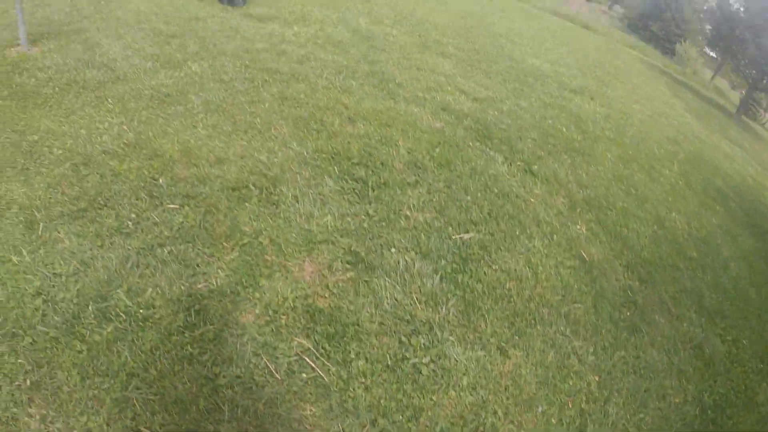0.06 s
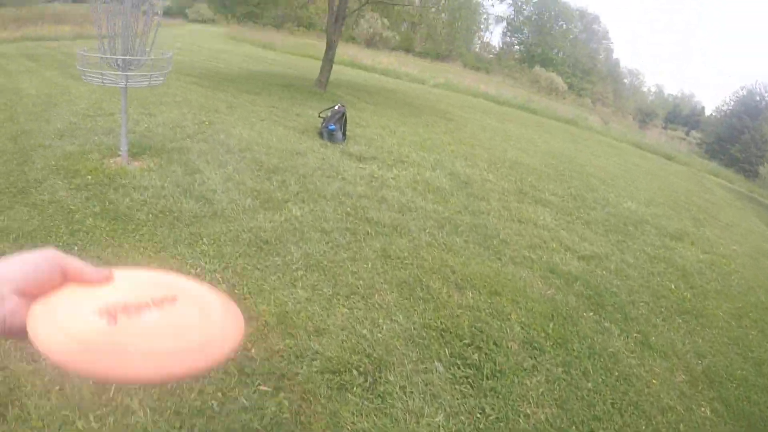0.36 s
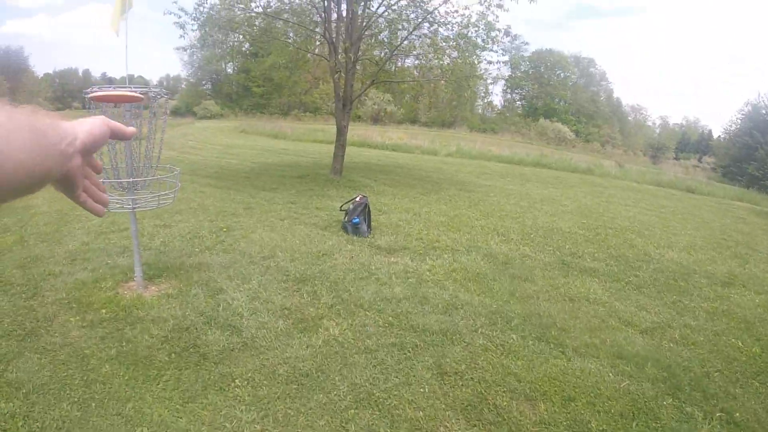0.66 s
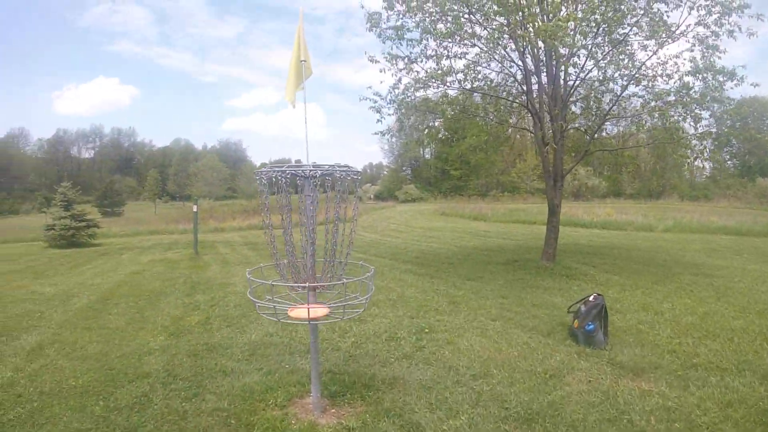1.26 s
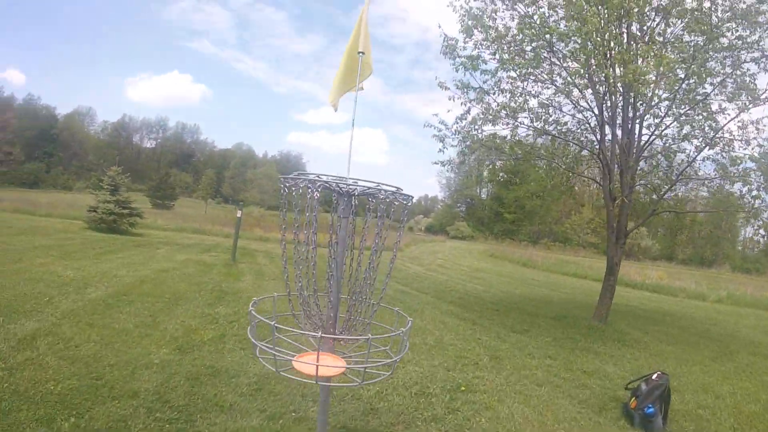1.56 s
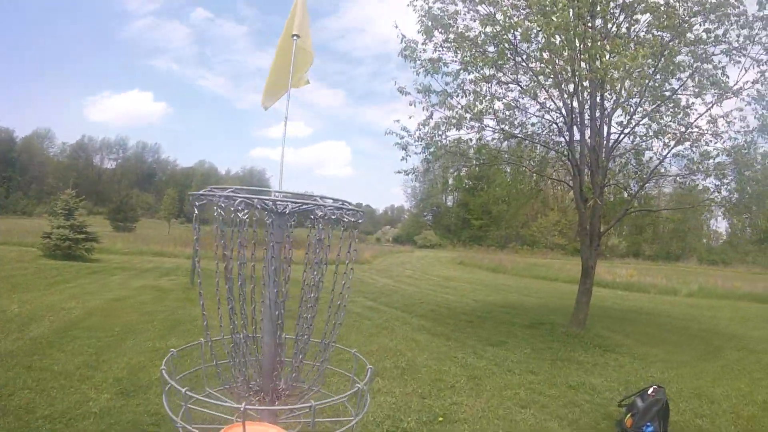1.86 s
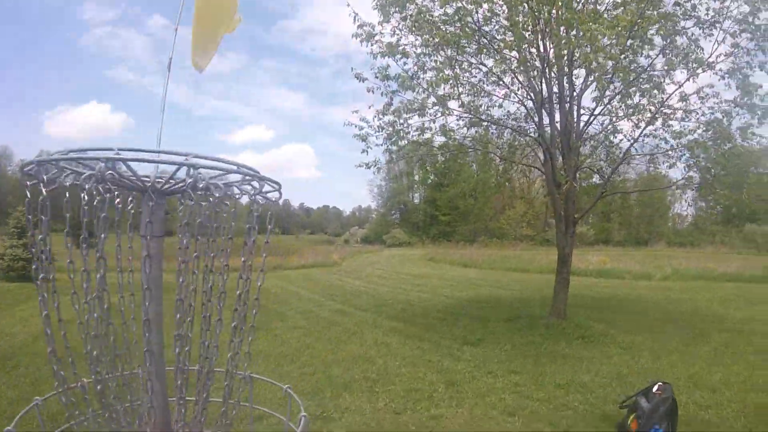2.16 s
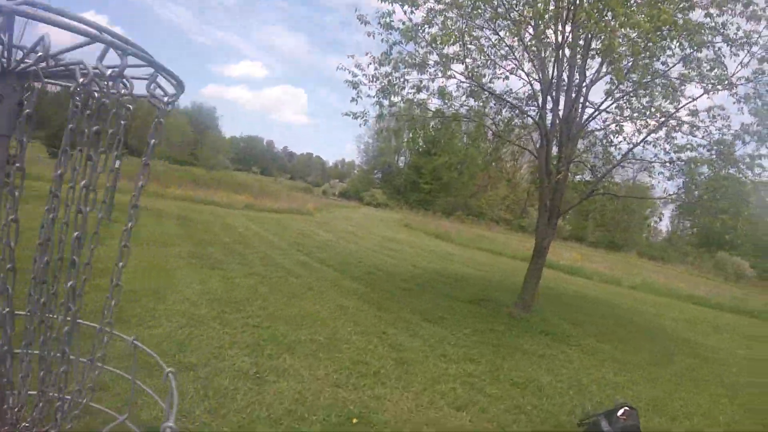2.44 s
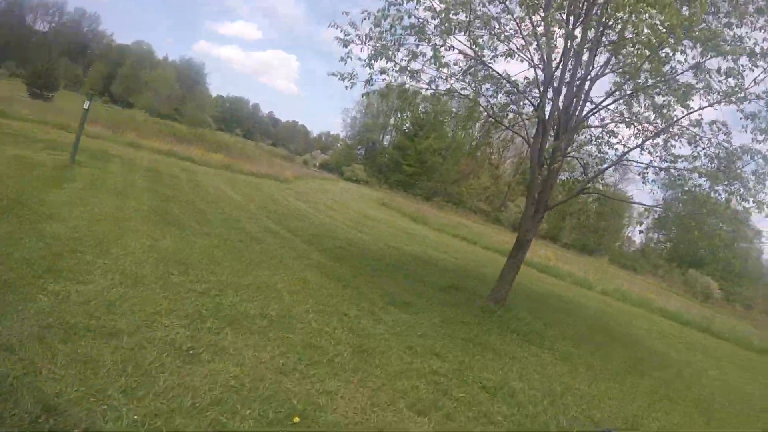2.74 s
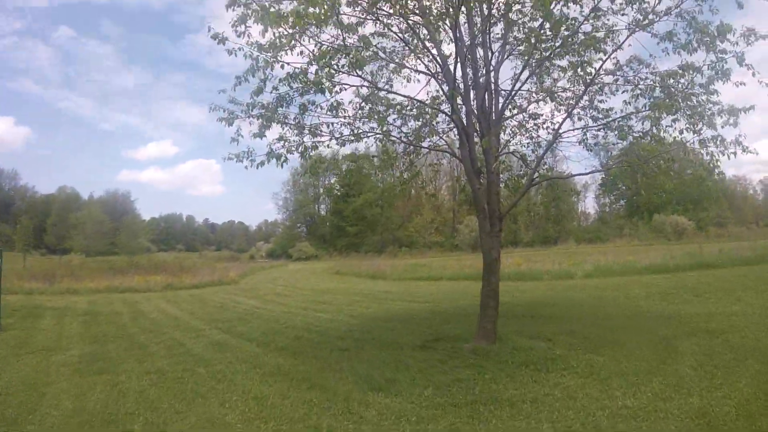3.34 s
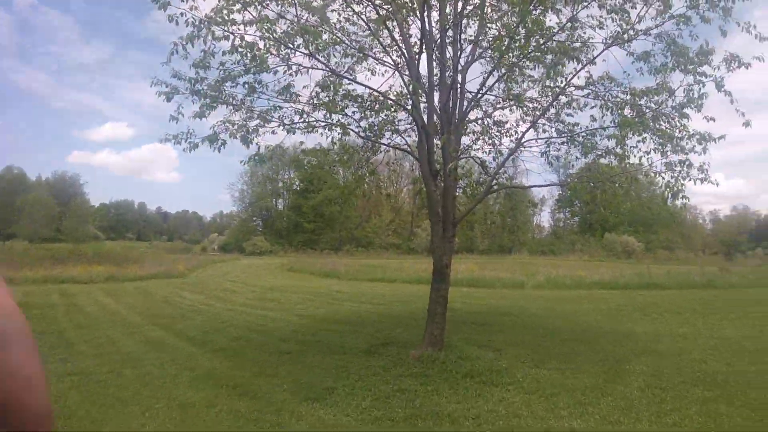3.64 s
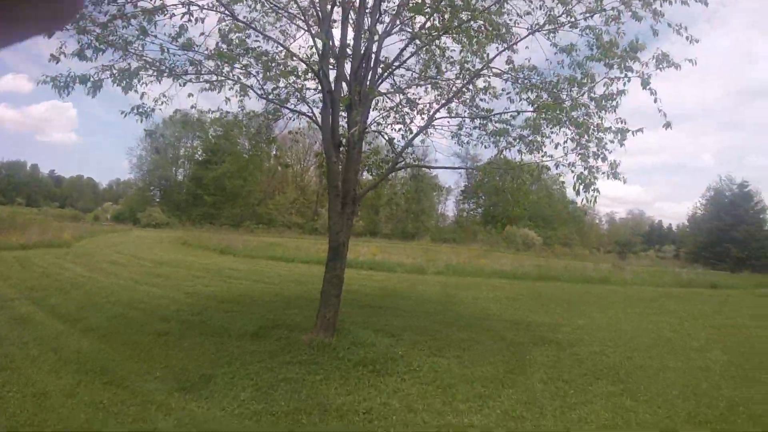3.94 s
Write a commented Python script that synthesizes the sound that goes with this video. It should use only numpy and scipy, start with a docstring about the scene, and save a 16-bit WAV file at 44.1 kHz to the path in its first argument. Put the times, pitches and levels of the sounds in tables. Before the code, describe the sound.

A thrown disc strikes the chains of a metal basket at about 0.9 seconds; the links jingle and settle, and the disc clacks lightly into the wire tray around 1.3 and 1.5 seconds. Clothes and air rustle over a body-worn microphone, with dull walking bumps above a faint steady hiss. From about 3.4 seconds a hand ticks, knocks loudly and scrapes on the microphone's housing, with low rumbles.

```python
"""A putted disc drops into the chains of a steel basket: links clash, ring, clatter and settle,
and the disc clacks into the wire tray. The thrower walks over a breezy lawn with a body-worn
microphone: its mount bumps, clothes and air rustle over it in swells, above a steady hiss.
At the end a hand knocks on its plastic housing, scrapes across it and pushes air at the port."""
import sys
import numpy as np
from scipy import signal
from scipy.fft import rfft, irfft
from scipy.io import wavfile

SR = 44100
rng = np.random.default_rng(int(sys.argv[2]) if len(sys.argv) > 2 else 0)


def transcribe(u):
    """Save the signal u as a 16-bit wav file named by the first command-line argument.

    u: samples, shape (n,) or (channels, n), limited to [-1, 1]; the rate is SR.
    q: integer samples, one column per channel.
    """
    v = np.clip(np.atleast_2d(u).T, -1, 1)
    q = np.round(v * 32767).astype(np.int16)
    wavfile.write(sys.argv[1], SR, q)


N = 176400
TIME_S = np.arange(N) / SR

# disc and chains clash: (time [s], ring [dB], clatter [dB], length [s], link pitch [Hz])
CLASHES = [(0.844, -47, -35.5, 0.036, 4620), (0.908, -37, -42, .008, 4514), (0.923, -48, -48, .03, 4500),
           (0.963, -32, -39, .012, 4500), (0.978, -31.5, -33.5, .015, 4470),
           (0.998, -29.5, -37, .008, 4490), (1.026, -35, -38.5, .03, 4450), (1.100, -49.5, -53, .02, 4500),
           (1.135, -44, -63, .02, 4730), (1.162, -47, -54, .008, 4730), (1.204, -43.5, -47, .005, 4410),
           (1.33, -36.5, -41, 0.0059, 4580), (1.365, -43.5, -50, .015, 4470), (1.703, -72, -55, .01, 4500),
           (1.825, -64, -54, .005, 4500), (3.314, -53, -62, .005, 4500)]
# steel links: (frequency [Hz], level [dB], t60 [s])
LINK_MODES = [(3550, -20, .5), (4530, -32, 0.19), (4473, -4.5, .58), (4540, -7.5, 0.32), (4640, -14, 0.32),
              (5170, -14, 0.2), (5260, -27, 0.11)]
# dense link overtones: (frequency [Hz], density [dB])
CLATTER_SPECTRUM = [(1200, -15), (2200, -18), (2750, 11.5), (3400, 1), (4000, -1), (4700, 9.5), (5400, -4),
                    (6400, -5.5), (7200, -18), (11000, -19), (15000, -28)]
# blurred top overtones: (frequency [Hz], density [dB])
SHIMMER_SPECTRUM = [(7000, -30), (11900, -24), (12450, -3), (12850, 5), (13400, -15), (13980, -1),
                    (14450, -17), (15200, -5)]
# disc lands and shifts: (time [s], level [dB])
TRAY_HITS = [(1.274, -41.5), (1.294, -39.5), (1.545, -48), (1.565, -49)]
# tray wires: (frequency [Hz], density [dB])
TRAY_SPECTRUM = [(400, -14), (850, 8), (1500, 6), (2200, -11), (2800, 17), (3600, 8), (4800, -2),
                 (6500, -14), (9000, -39)]

# finger ticks: (time [s], level [dB], focus [Hz])
TICKS = [(2.501, -35, 6300), (3.425, -28, 5500), (3.454, -16, 930), (3.456, -30, 2650), (3.540, -20, 3100),
         (3.5414, -16, 3150), (3.547, -19, 990), (3.713, 1.5, 2130), (3.72, -1.5, 2407),
         (3.7194, 14.5, 650), (3.864, -3, 1490), (3.898, -14.5, 1900), (3.911, -5.5, 1860),
         (3.924, -11.5, 2500), (3.967, -18, 3540), (3.980, -2.5, 3830), (3.984, -4.5, 1360),
         (3.9905, 1.5, 3860)]
# plastic housing: (frequency [Hz], level [dB], t60 [s])
HOUSING_MODES = [(348, -6.5, 0.053), (417, -6.5, 0.039), (713, -7.5, 0.017), (984, -13.5, 0.023),
                 (1410, -4, 0.015), (1860, -4.5, 0.023), (2140, -10, 0.021), (2491, -4, 0.022),
                 (3190, -13, .012), (3434, -13.5, 0.027), (4050, -12.5, 0.0064), (6260, -14, 0.013),
                 (8000, -32, .006)]
# dry snap of a tick: (frequency [Hz], density [dB])
SNAP_SPECTRUM = [(200, 0), (720, 10), (1100, 9), (2300, -1), (4200, 9), (6500, -25), (9000, -37),
                 (15000, -44)]
# low thumps of housing knocks: (peak time [s], level [dB], frequency [Hz], pre-ring [s], decay [s])
THUMPS = [(3.7207, 4.5, 154, 0.008, 0.0072), (3.724, -8.5, 344, 0.0016, 0.0065),
          (3.864, -11.5, 167.8, 0.0088, 0.0065)]
# hand drag: (time [s], level [dB])
SCRAPE_LEVEL = [(3.50, -112), (3.70, -51), (3.80, -60), (3.842, -56), (3.857, -36.5), (3.866, -33.5),
                (3.880, -54.5), (3.893, -41), (3.908, -26.5), (3.926, -25), (3.948, -34), (3.985, -22),
                (4.0, -27.5)]
# friction hiss: (frequency [Hz], density [dB])
FRICTION_SPECTRUM = [(200, 12), (600, 2.5), (900, -7), (1400, -32), (1900, 6), (2600, 10.5), (3100, 7),
                     (3800, 12), (4400, 3), (5000, -4), (5600, -1), (6400, -9.5), (7300, -19), (12000, -24),
                     (15000, -47)]
# air pushed at the port: (time [s], level [dB])
RUMBLE_LEVEL = [(3.60, -80), (3.68, -57), (3.715, -17), (3.76, -46), (3.81, -36), (3.84, -28),
                (3.88, -28.5), (3.912, -9.5), (3.945, -39), (3.97, -25), (4.0, -5)]
# pushed air: (frequency [Hz], density [dB])
RUMBLE_SPECTRUM = [(15, 1.5), (30, 7.5), (50, 5.5), (80, -7), (150, -6), (220, -6), (350, -23), (700, -63)]

# stride bumps: (time [s], level [dB])
BUMPS = [(0.886, -23), (0.924, -30), (1.474, -27), (2.091, -26.5), (2.735, -29.5), (2.937, -35),
         (3.340, -23.5)]
# microphone mount: (frequency [Hz], level [dB], t60 [s])
MOUNT_MODES = [(166, 2.5, 0.025), (315, -0.5, 0.012), (704, -4.5, 0.0066), (1340, -4, 0.0038),
               (1980, -21, 0.0092)]
# clothes and air on the microphone: (time [s], level [dB])
RUSTLE_LEVEL = [(0.0, -64), (0.15, -62.5), (0.24, -49.5), (0.31, -61), (0.37, -53), (0.46, -55),
                (0.48, -47.5), (0.54, -59.5), (0.66, -60.5), (0.72, -51), (0.84, -59.5), (0.85, -49),
                (0.87, -59), (0.88, -55.5), (0.92, -38.5), (0.98, -55.5), (1.07, -56), (1.11, -42.5),
                (1.16, -46.5), (1.23, -60), (1.31, -51), (1.35, -57.5), (1.46, -62), (1.47, -57),
                (1.58, -52.5), (1.6, -61), (1.71, -55.5), (1.78, -66.5), (1.92, -48.5), (2.02, -62.5),
                (2.1, -41.5), (2.15, -48.5), (2.17, -55.5), (2.24, -61), (2.36, -58.5), (2.38, -65),
                (2.52, -60), (2.53, -67), (2.64, -62), (2.72, -45), (2.77, -56.5), (2.9, -51.5),
                (2.92, -56), (3.27, -59.5), (3.33, -52.5), (3.41, -51), (3.46, -46.5), (3.47, -52),
                (3.48, -62), (3.52, -57)]
# hollow body of the rustle: (frequency [Hz], density [dB])
BODY_SPECTRUM = [(30, -19), (100, -41), (122, -15), (150, 3), (200, 1), (265, -7), (350, -2.5), (450, -9),
                 (650, -16.5), (900, -21.5), (1500, -51)]
# rasp of the rustle: (frequency [Hz], density [dB])
RASP_SPECTRUM = [(450, -40.5), (760, -7.5), (900, -9), (1280, 6), (1560, -7.5), (2120, 2.5), (2280, -6.5),
                 (2500, 1), (2850, -3.5), (3300, -5), (4400, -17), (5500, -27), (12000, -44.5)]
# crisp fabric brushing by: (time [s], level [dB])
FABRIC_LEVEL = [(0, -88), (2.05, -78), (2.12, -56), (2.28, -66.5), (2.36, -83), (2.5, -58.5), (2.58, -73),
                (2.75, -61), (2.9, -58.5), (3.15, -68.5), (3.43, -53.5), (3.5, -60.5), (3.76, -63),
                (4.0, -46)]
# fabric crackle: (frequency [Hz], density [dB])
FABRIC_SPECTRUM = [(1500, -12), (3000, 4.5), (4400, 8.5), (5300, -6.5), (6400, -3.5), (8000, -20),
                   (14000, -34)]
# open air and microphone hiss: (frequency [Hz], density [dB])
HISS_SPECTRUM = [(100, 0), (400, 17.5), (1200, 8.5), (3000, 4), (4600, -12), (5700, -4.5), (6600, 4.5),
                 (9000, 2.5), (11500, -4), (15000, -7)]


def from_db(db):
    """Decibels to gain."""
    return 10 ** (np.asarray(db) / 20)


def unit_rms(x):
    """Scale to rms 1."""
    return x / np.sqrt(np.mean(x ** 2) + 1e-20)


def curve(rows):
    """Breakpoints to one value per sample."""
    return np.interp(TIME_S, *np.transpose(rows))


def drift(rate_hz):
    """Slow random wander; rms 1."""
    pole = np.exp(-2 * np.pi * rate_hz / SR)
    return unit_rms(signal.lfilter([1], [1, -2 * pole, pole * pole], rng.standard_normal(N + SR))[SR:])


def coloured(x, spectrum):
    """Filter by a smooth spectrum; rms 1."""
    hz, db = np.transpose(spectrum)
    bins_hz = np.maximum(np.fft.rfftfreq(N, 1 / SR), 1)
    gain = from_db(np.interp(np.log(bins_hz), np.log(hz), db))
    return unit_rms(irfft(rfft(x) * gain, N))


def noise(spectrum):
    """Coloured noise; rms 1."""
    return coloured(rng.standard_normal(N), spectrum)


def grains(per_s, spread_db):
    """Tiny random slips of uneven size; rms 1."""
    sizes = from_db(spread_db * np.minimum(rng.exponential(1, N), 4))
    return unit_rms((rng.random(N) < per_s / SR) * sizes * rng.choice([-1, 1], N))


def clicks(times_s, heights):
    """One impulse at each time."""
    return np.bincount((np.asarray(times_s) * SR).astype(int), heights, N)[:N]


def ring(x, hz, t60_s):
    """One mode: a unit click starts a decaying unit sine."""
    r, w = from_db(-60 / (t60_s * SR)), 2 * np.pi * hz / SR
    return signal.lfilter([0, np.sin(w)], [1, -2 * r * np.cos(w), r * r], x + 1e-18)


def strike(times_s, heights, modes, spread_db, emphasis=1):
    """Each blow excites each mode with a random strength."""
    weights = emphasis * from_db(spread_db * rng.standard_normal((len(times_s), len(modes))))
    return sum((-1) ** k * from_db(db) * ring(clicks(times_s, heights * weights[:, k]), hz, t60_s)
               for k, (hz, db, t60_s) in enumerate(modes))


def wash(times_s, heights, spectrum, t60_s):
    """Each blow adds decaying noise: overtones too dense to resolve."""
    decay = from_db(-120 / (t60_s * SR))
    energy = signal.lfilter([1], [1, -decay], clicks(times_s, heights ** 2) + 1e-18)
    return np.sqrt(energy) * noise(spectrum)


def chains(contacts_per_s=400, contact_spread_db=2.0, link_gain_db=1.5, detune_hz=53):
    """Contacts share a clash's energy; each rings one link. The chain rings on, clatters, shimmers."""
    contacts, struck_links = [], 0
    for start_s, ring_db, clatter_db, length_s, hz in CLASHES:
        jitter = rng.random(64)
        size, detune = rng.standard_normal((2, 64))
        k = np.arange(int(np.clip(length_s * contacts_per_s, 1, len(jitter))))
        times_s = start_s + length_s * (k + jitter[k] * (k > 0)) / len(k)
        share = from_db(contact_spread_db * size[k])
        share /= np.linalg.norm(share)
        for i in k:
            blow = clicks([times_s[i]], [share[i] * from_db(ring_db + link_gain_db)])
            struck_links += ring(blow, hz + detune_hz * detune[i], t60_s=0.11)
        shimmer_db = -44.5 + 0.5 * clatter_db
        contacts.append([times_s, share * from_db(clatter_db), share * from_db(shimmer_db)])
    times_s, clatter_heights, shimmer_heights = np.hstack(contacts)
    starts_s, ring_db = np.transpose(CLASHES)[:2]
    ringing = strike(starts_s, from_db(ring_db), LINK_MODES, spread_db=1.5)
    clatter = wash(times_s, clatter_heights, CLATTER_SPECTRUM, t60_s=0.086)
    shimmer = wash(times_s, shimmer_heights, SHIMMER_SPECTRUM, t60_s=0.32)
    return struck_links + ringing + clatter + shimmer


def tray():
    """The plastic disc clacks on the wires."""
    times_s, db = np.transpose(TRAY_HITS)
    return wash(times_s, from_db(db), TRAY_SPECTRUM, t60_s=0.051)


def finger_ticks(focus_db_per_octave=22, hard_snap_db=-15.5, hard_tick_hz=2280):
    """Each tick favours the housing modes of the spot it hits; softer contact snaps less."""
    times_s, db, focus_hz = np.transpose(TICKS)
    octaves_off = np.abs(np.log2(np.array(HOUSING_MODES)[:, 0] / focus_hz[:, None]))
    emphasis = from_db(-focus_db_per_octave * np.minimum(octaves_off, 1))
    shell = strike(times_s, from_db(db), HOUSING_MODES, spread_db=3.5, emphasis=emphasis)
    hardness = np.minimum(focus_hz / hard_tick_hz, 1) ** 2
    snap = wash(times_s, from_db(db + hard_snap_db) * hardness, SNAP_SPECTRUM, t60_s=0.014)
    return shell + snap


def housing_thumps():
    """Low thumps of knocks; the recorder's low-cut filter rings just before and after each."""
    thumps = np.zeros(N)
    for peak_s, db, hz, pre_ring_s, decay_s in THUMPS:
        t = TIME_S - peak_s
        envelope = np.exp(np.minimum(t / pre_ring_s, -t / decay_s))
        thumps += from_db(db) * envelope * np.cos(2 * np.pi * hz * t)
    return thumps


def hand_scrape(friction_gain_db=1):
    """Dense slips ring the housing and hiss with friction."""
    slips = grains(per_s=2300, spread_db=2.5)
    shell = sum((-1) ** k * from_db(db) * ring(slips, hz, t60_s)
                for k, (hz, db, t60_s) in enumerate(HOUSING_MODES))
    friction = from_db(friction_gain_db) * coloured(slips, FRICTION_SPECTRUM)
    return from_db(curve(SCRAPE_LEVEL)) * (unit_rms(shell) + friction)


def port_rumble():
    """Air pushed by the hand rumbles at the port."""
    return from_db(curve(RUMBLE_LEVEL)) * noise(RUMBLE_SPECTRUM)


def mount_bumps(low_cut_hz=203):
    """The mount knocks dully as the walker moves."""
    times_s, db = np.transpose(BUMPS)
    knocks = strike(times_s, -from_db(db), MOUNT_MODES, spread_db=1.2)
    return signal.sosfilt(signal.butter(4, low_cut_hz, "high", fs=SR, output="sos"), knocks)


def rustle(body_gain_db=6.5, rasp_gain_db=1.08, body_flutter_db=2.08, rasp_flutter_db=1.5):
    """Clothes and air rub in swells: a fluttering low body under a grainy rasp."""
    level_db = curve(RUSTLE_LEVEL)
    pivot_db, body_swing = -50, 0.85
    body_db = pivot_db + body_swing * (level_db - pivot_db) + body_gain_db
    body_db += body_flutter_db * drift(rate_hz=15.3)
    fibres = rng.standard_normal(N) + 0.27 * grains(per_s=780, spread_db=1)
    body = from_db(body_db) * noise(BODY_SPECTRUM)
    rasp_db = level_db + rasp_gain_db + rasp_flutter_db * drift(rate_hz=30)
    return body + from_db(rasp_db) * coloured(fibres, RASP_SPECTRUM)


def fabric():
    """Fine, uneven slips make cloth crackle."""
    return from_db(curve(FABRIC_LEVEL)) * coloured(grains(per_s=1800, spread_db=3.5), FABRIC_SPECTRUM)


def hiss(level_db=-61):
    """Steady noise of open air and microphone."""
    return from_db(level_db) * noise(HISS_SPECTRUM)


def scene():
    """The basket plus all that touches the microphone; mono."""
    basket = chains() + tray()
    walking = rustle() + fabric() + mount_bumps()
    hand = finger_ticks() + housing_thumps() + hand_scrape() + port_rumble()
    return (basket + walking + hand + hiss())[None]


def record(dry):
    """Soft overload on the loudest knocks, then a steep treble cut."""
    ceiling, stopband_hz = 0.85, 16000
    clipped = ceiling * np.tanh(dry / ceiling)
    return signal.sosfilt(signal.cheby2(16, 70, stopband_hz, fs=SR, output="sos"), clipped)


dry = scene()
out = record(dry)
transcribe(out)
```